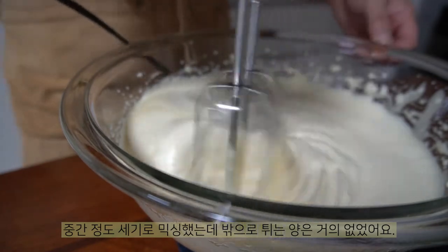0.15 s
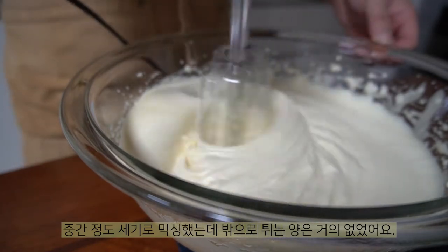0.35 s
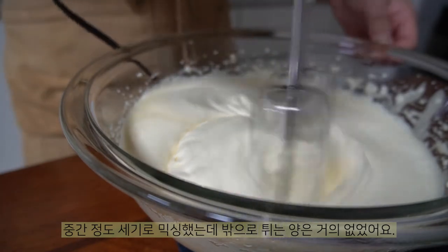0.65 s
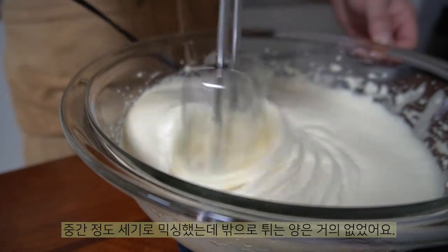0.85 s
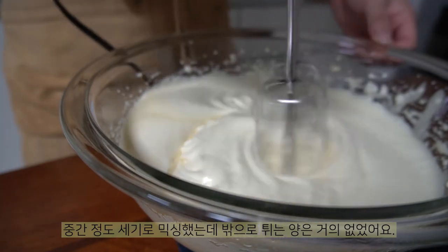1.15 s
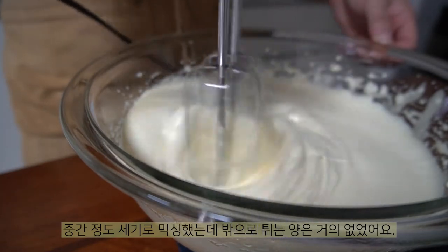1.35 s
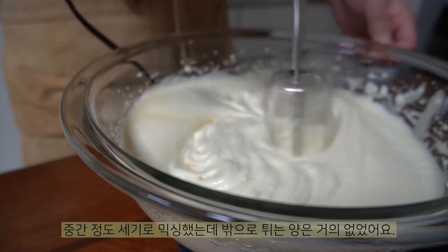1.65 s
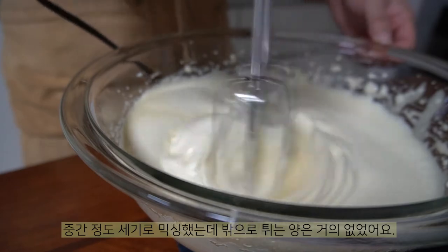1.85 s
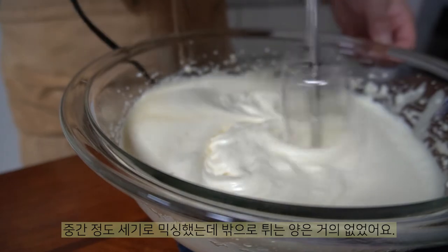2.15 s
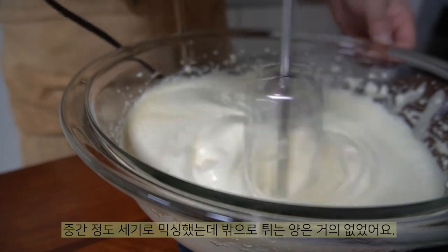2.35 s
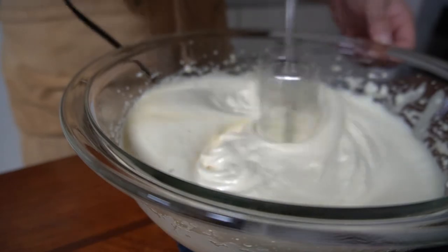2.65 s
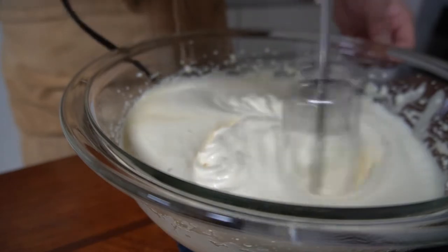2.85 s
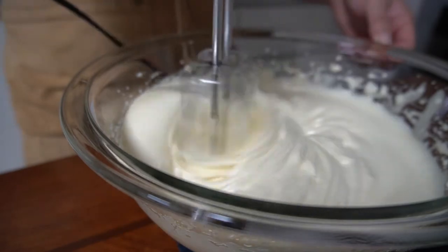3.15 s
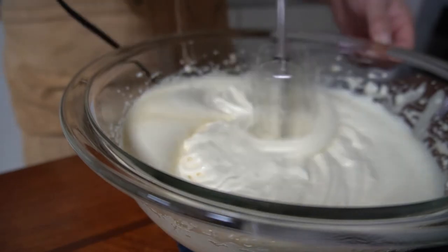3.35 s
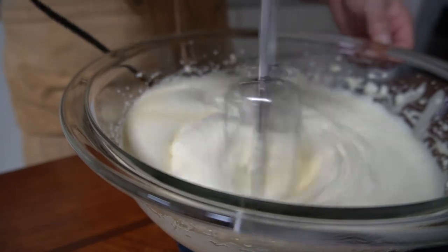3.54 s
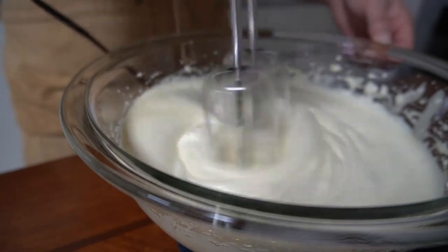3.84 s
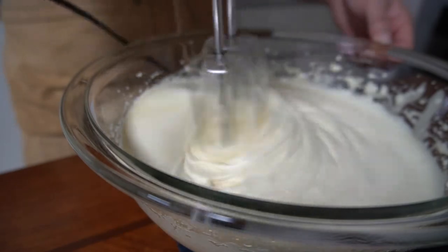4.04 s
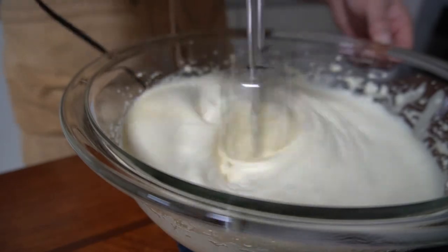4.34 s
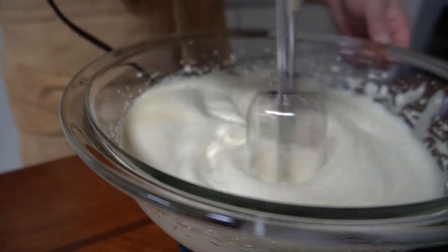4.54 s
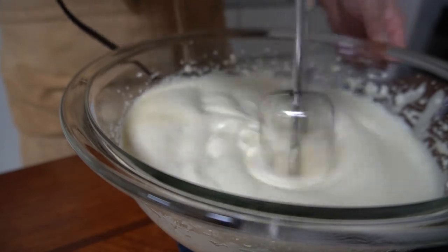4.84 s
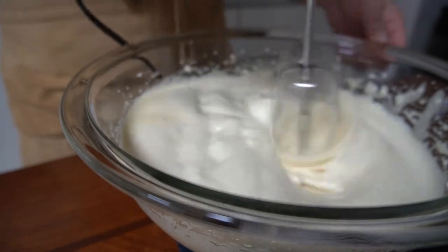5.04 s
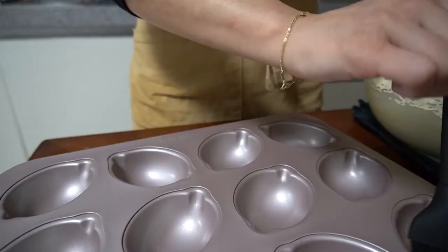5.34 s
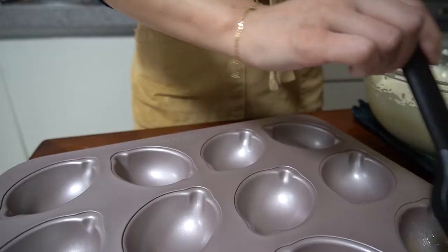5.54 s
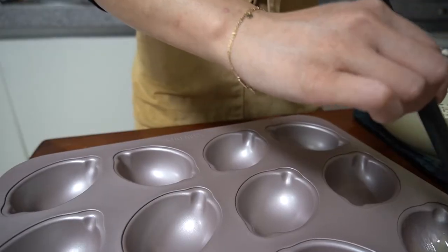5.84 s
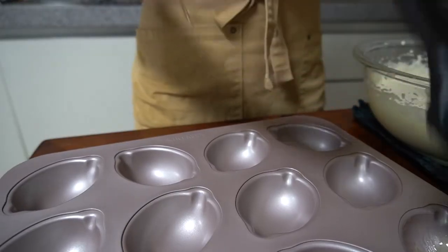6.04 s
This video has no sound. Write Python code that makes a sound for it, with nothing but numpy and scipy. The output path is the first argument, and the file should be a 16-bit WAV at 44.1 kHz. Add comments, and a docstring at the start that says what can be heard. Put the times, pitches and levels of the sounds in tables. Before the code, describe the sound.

Close, bright mixer whine and rushing air swirl over a glass bowl, then stop dead; a ladle scrapes and lightly taps in a hushed kitchen.

```python
"""First an electric hand mixer circles through thick batter in a glass bowl, close to a stereo microphone.
Tones at multiples of the shaft speed make its whine; shaped noise makes brush hiss, fan air, roar and slop.
The sound then cuts to a quiet kitchen with a humming appliance: a sine over soft noise. A ladle scrapes
the bowl (grainy noise through resonances) and taps it once (fading sines); small noise ticks fall."""
import sys
import numpy as np
from scipy import signal
from scipy.fft import rfft, irfft, next_fast_len
from scipy.io import wavfile
from scipy.ndimage import uniform_filter1d, map_coordinates

SR = 44100
rng = np.random.default_rng(int(sys.argv[2]) if len(sys.argv) > 2 else 0)


def digitize_waveform(pressure):
    """Quantize a signal to 16-bit integers and store it at the path in sys.argv[1].

    Rows of a 2-D input are taken as channels; values are limited to [-1, 1].
    """
    field = np.atleast_2d(pressure).T
    bounded = np.clip(field, -1, 1)
    quanta = np.round(bounded * 32767).astype(np.int16)
    wavfile.write(sys.argv[1], SR, quanta)


def boost(x):
    """Linear amplitude factor 10**(x/20) for a level x in decibels (scalar or array-like)."""
    u = np.asarray(x, float) / 20
    return 10 ** u


N = 272959
TIME = np.arange(N) / SR  # s

CUT_S, TOP_HZ = 5.2205, 15740  # the mixer scene ends; nothing sounds above this
# Spectra below give only the shape of a noise; its loudness is set separately.

# Quiet kitchen air: f/Hz, level/dB per Hz
AIR_SPECTRUM = [(15, -16), (30, -2), (60, -16), (100, 0), (150, -2.5), (250, -1), (320, -4), (450, -5.5),
                (650, -14), (900, -20), (1600, -25), (3000, -28.5), (6000, -31.5), (15700, -40.5)]
# Likeness of left and right in the kitchen: f/Hz, correlation
KITCHEN_LIKENESS = [(60, 1.0), (180, 0.99), (550, 0.93), (1650, 0.28), (4970, 0.07), (15000, 0.17)]
# Small ticks: t/s, peak level/dB, centre f/Hz, width/Hz, time to fade by 60 dB/s
TICKS = [(5.3212, -50, 3000, 3000, .01), (5.3531, -44, 7200, 2500, .012), (5.49, -52, 9000, 8000, .04),
         (5.605, -38, 5400, 8500, .006), (5.676, -51, 3770, 4800, 0.082), (5.862, -52, 12000, 8000, .02),
         (5.872, -49, 8000, 5000, .02)]
# The struck bowl's ring: f/Hz, typical level/dB, time to fade by 60 dB/s
GLASS_RING = [(1760, -51, 0.1), (2380, -58, .1), (3100, -58, .1), (3400, -60, .08), (4950, -63, .07),
              (5500, -62, .07), (6050, -61, .06)]
# Resonances of the scraped bowl: f/Hz, width/Hz, level/dB
BOWL_MODES = [(390, 79, 1.5), (570, 94, -0.5), (720, 110, -4.5)]
# Resonances of the ladle, before squaring: f/Hz, width/Hz, level/dB
LADLE_MODES = [(1020, 240, 0.5), (1347, 170, 4.5), (1820, 590, -5)]
# Ladle strokes: t of full pressure/s, rise/s, hold/s, ladle level/dB, bowl level/dB
STROKES = [(5.233, .01, .06, -72.5, -47.5), (5.382, 0.12, 0.1, -51, -39.5), (5.688, .015, .005, -52, -44.5),
           (5.768, .02, .04, -55, -52), (5.856, .07, .095, -52, -41.5)]
KITCHEN_HUM_HZ, TAP_S = 59.4, 5.677
RISE_DB = 14.5  # a stroke gains this much over its rise time
BOWL_SAG_DB_PER_S = 52  # while the pressure holds
LADLE_FALL_DB_PER_S, BOWL_FALL_DB_PER_S = 550, 220  # after letting go
REST_LADLE_DB, REST_BOWL_DB = -68, -58  # the ladle keeps brushing faintly between strokes

# Appliance hum under the mixer: f/Hz, mean level/dB
DRONE = [(59.2, -62.5)]
# Slopping batter: f/Hz, level/dB per Hz
SLOP_SPECTRUM = [(10, -45), (28, -23), (48, -28), (95, -23.5), (113, -14.5), (200, -11), (240, -4),
                 (330, -3.5), (420, -6), (700, -16), (910, -48), (1540, -120)]
# Roar of the housing: f/Hz, level/dB per Hz
ROAR_SPECTRUM = [(80, -120), (180, -31.5), (300, -19.5), (420, -10.5), (560, -11), (700, -10), (900, -12),
                 (1300, -10.5), (1500, -10), (2100, -8.5), (3000, -9.5), (3900, -36), (6600, -120)]
# Hiss of the brushes: f/Hz, level/dB per Hz
HISS_SPECTRUM = [(600, -120), (1500, -45), (2500, -15), (3000, -9.5), (4000, -5), (5100, -9.5),
                 (5900, -9.5), (6800, -11), (7900, -12.5), (10000, -12.5), (12000, -17), (14000, -18.5),
                 (14900, -18), (15700, -24)]
# Ring of the fan air, before squaring and shifting: f/Hz, width/Hz, level/dB
VENT_MODES = [(3276, 333, 3.5), (3795, 110, -1.5)]
# Air resonances of the housing, which lift the hiss: f/Hz, width/Hz, level/dB before the fourth power
HOUSING_MODES = [(5460, 380, 2.3), (6290, 470, 1.5), (7370, 760, 1.3)]
# Likeness of left and right by the mixer: f/Hz, correlation
MIXER_LIKENESS = [(60, .999), (120, .989), (250, .994), (400, .994), (700, .975), (1290, 0.93), (2380, 0.9),
                  (4400, 0.86), (8120, 0.63), (15000, .33)]
# The batter's drag slows the shaft: t/s, mean speed/turns per s
SHAFT_SPEED = [(0.0, 411.34), (0.28, 411.43), (0.56, 410.66), (2.24, 410.2), (2.52, 410.82), (2.8, 410.08),
               (3.36, 409.74), (4.06, 410.39), (4.41, 410.38), (4.62, 409.01), (4.69, 409.76),
               (4.97, 408.87), (5.04, 409.75), (5.18, 409.15)]
# Whine: order/multiple of shaft speed, sideband/multiple of MAINS_HZ, mean level/dB
# (where the hand steers an order, this level only sets its left-right difference)
WHINE_ORDERS = [(1, -1, -55), (1, 0, -42), (1, 1, -43), (1, 2, -56), (2, 0, -43), (3, -1, -51), (3, 0, -46),
                (4, 0, -42), (4, 1, -48), (5, 0, -51), (6, 0, -53), (6, 1, -51), (7, -1, -50), (9, 0, -40),
                (10, 0, -54), (11, 0, -56), (12, 0, -45), (12, 1, -58), (13, 0, -55), (14, 0, -55),
                (16, 0, -53), (17, 0, -59), (18, -1, -61), (18, 0, -54), (20, 0, -55), (21, 0, -59),
                (22, 0, -50), (23, 0, -53), (23, 1, -60), (24, -1, -54), (24, 0, -44), (24, 1, -47.5),
                (25, -1, -64), (25, 0, -55.5), (26, 1, -62), (27, 0, -63), (28, 0, -59), (29, 0, -66),
                (30, 0, -51), (31, -1, -66), (31, 0, -64), (32, 0, -54), (33, 0, -63), (34, 0, -65),
                (35, 0, -62), (36, 0, -52), (36, 1, -60), (37, 0, -64), (38, 0, -64)]
# Weak tones of the worm gear: order/multiple of shaft speed, mean level/dB
GEAR_TONES = [(.188, -61), (3.17, -54), (3.29, -54), (3.44, -54), (5.165, -54)]
# Strong orders that the hand steers: order/multiple of shaft speed
STEERED_ORDERS = (1, 2, 3, 4, 9, 12, 22, 24, 30, 32, 36)
# How each of these follows the hand: level/dB, then dB per unit of turn, of leftward, of lift
STEERED_LEVELS = [(-42, 1, 1.26, 0.65), (-42.5, -0.1, -0.1, 1.0), (-45, -2.5, 1, -0.8),
                  (-41.5, -1.2, -0.1, 1.0), (-40, 3, -2, -0.5), (-45.5, 4.5, -1, 1.5), (-50, -1, -0.5, 0.5),
                  (-43, 3.5, 1.5, 0.5), (-53, -3, -2, -0.1), (-52, -1, 3, 2), (-51, -2, 2.5, -2.7)]
# The circling hand: t/s, turn of the vents, leftward, lift (each in units of its own mean swing)
HAND_PATH = [(0.0, -0.0, -0.8, 0), (0.21, -2, 0.5, 1), (0.42, 1, 0.3, 1), (0.63, 1, -1.6, 1.2),
             (0.77, -1.2, 1.3, -0.3), (0.98, 0.5, 0, 1.6), (1.12, 1.5, -0.9, -1.2), (1.26, -0.8, 0.1, 0.5),
             (1.47, -0.5, 1, -0.5), (1.54, 1, 0.3, 2.7), (1.61, 1, -1.0, -0.5), (1.96, -0.8, -0.5, 0.5),
             (2.1, 0.9, -0.4, 1.2), (2.24, -1, -2.7, -1.1), (2.45, -1.2, 0.5, 0.7), (2.59, 0.7, 0.1, 0),
             (2.94, -1.2, -3, 0.7), (3.08, -0.6, 1, 0.2), (3.22, 0.6, 1.2, 0.1), (3.43, 0.5, -0.6, 1),
             (3.64, -1.0, 0, -0.3), (3.78, 0.5, 0.3, 1.7), (3.92, -0.5, 1, -0.8), (4.13, 0.9, 1.5, -1.7),
             (4.34, 0.7, 1.2, -1), (4.48, 1.5, 0.5, -3), (4.55, 3, 0.2, -1), (4.76, 0.4, -0.4, -1.8),
             (4.97, -0.1, -1.5, -0.9), (5.18, 1.4, -1.5, -0.7)]
MAINS_HZ = 120  # the motor's pull pulses at twice the mains frequency

# How the noises follow the hand: level/dB, then dB per unit of turn, of leftward, of lift
SLOP_DB, ROAR_DB = (-42.5, 0, 0.35, 0), (-32.5, -0.37, -0.3, 0.05)
VENT_DB, HISS_DB = (-31, -0.1, 0.55, -0.3), (-31.5, -0.04, 0.6, 0.4)
# Left level minus right level, same columns
VENT_PAN_DB, HISS_PAN_DB = (-3.5, 0.45, 1, 0), (-1.9, 0.3, 0.8, 0.4)
ROAR_PAN_DB = (-0.53, -0.14, 0.61, 0.15)
# The fan's ring moves with the hand: shift/Hz, then Hz per unit of turn, of leftward, of lift
VENT_SHIFT_HZ = (0, 0, 10, 0)
VENT_WANDER_HZ = 15  # rough size of its random drift
# Shifting wall echoes beat against each steered order
ECHO_SHARE, ECHO_SHARE_PER_KHZ, ECHO_RATE = 0.03, 0.036, 10  # rate in random points per s
HEADROOM_DB = 5  # turning toward the microphone lifts an order at most this much; away fades it deeper


def unit(x):
    """Scale to rms 1."""
    return x / np.sqrt(np.mean(np.abs(x) ** 2) + 1e-20)


def along(points, hz):
    """Read a table of frequencies and values on a log frequency axis."""
    f, v = np.transpose(points)
    return np.interp(np.log(hz + 1), np.log(f + 1), v)


def curves(rows):
    """Join the points of each column after the time: one value per sample."""
    s, *columns = np.transpose(rows)
    return [np.interp(TIME, s, column) for column in columns]


def wobble(rate):
    """A smooth random curve through this many random points a second."""
    return map_coordinates(rng.standard_normal(800), [np.arange(N) * rate / SR])


def resonance(modes, f):
    """Add up the responses of damped resonators, with alternating sign."""
    total = 0
    for k, (centre, width, db) in enumerate(modes):
        peak = 1j * f * width / (centre * centre - f * f + 1j * f * width)
        total = total + (-1) ** k * boost(db) * peak
    return total


def filtered(x, response):
    """Multiply the spectrum of x by a response of frequency."""
    m = next_fast_len(N + 8192)
    return irfft(rfft(x, m) * response(np.fft.rfftfreq(m, 1 / SR)), m)[..., :N]


def rush(gain, alike, patchy_db, gate=1):
    """Stereo noise of rms 1 with patches of random gain, multiplied by a gate."""
    z = signal.stft(rng.standard_normal((2, N)), nperseg=512)[2]
    field = uniform_filter1d(rng.standard_normal(z.shape[1:]), 6, 0)  # smooth over frequency
    field = uniform_filter1d(field, 14, 1)  # then over time
    patchy = signal.istft(z * boost(patchy_db * unit(field)), nperseg=512)[1][:, :N]

    def middle_and_side(hz):
        # this angle gives left and right the wanted correlation
        angle = np.arccos(np.clip(along(alike, hz), -1, 1)) / 2
        return gain(hz) * [np.cos(angle), np.sin(angle)]

    mid, side = filtered(gate * patchy, middle_and_side)
    return unit(np.array([mid + side, mid - side]))


def kitchen_hum():
    """The appliance hums as one sine whose level wavers."""
    return np.sqrt(2) * boost(-43.5 + 0.89 * wobble(6)) * np.sin(2 * np.pi * KITCHEN_HUM_HZ * TIME)


def room_air():
    """Quiet room air is soft, mostly low noise."""
    return boost(-45) * rush(lambda hz: boost(along(AIR_SPECTRUM, hz)), KITCHEN_LIKENESS, patchy_db=1.2)


def ticks():
    """Short bursts of noise with a soft start, each in its own band."""
    total, t = np.zeros(N), np.arange(SR // 10) / SR
    for s, db, hz, width, t60 in TICKS:
        edges = np.clip([hz - width / 2, hz + width / 2], 100, SR / 2.5)
        band = signal.butter(2, edges, "band", fs=SR)
        burst = signal.lfilter(*band, rng.standard_normal(len(t)))
        burst *= boost(-60 * t / t60) * (1 - np.exp(-t / t60 / 0.079))
        total[round(s * SR):][:len(t)] += boost(db) * burst / np.abs(burst).max()
    return total


def tap():
    """The tapped glass rings in fading sines under a soft contact."""
    total, t = np.zeros(N), np.arange(SR // 5) / SR
    ring = 0
    for hz, db, t60 in GLASS_RING:
        ring = ring + boost(db + rng.normal(0, 1.5) - 60 * t / t60) * np.sin(2 * np.pi * hz * t)
    total[round(TAP_S * SR):][:len(t)] = ring * (1 - np.exp(-t / 0.004))
    return total


def strokes():
    """Gains of the ladle's and the bowl's ring: each stroke presses on, holds and lets go."""
    ladle, bowl = boost(REST_LADLE_DB), boost(REST_BOWL_DB)
    for s, rise, hold, ladle_db, bowl_db in STROKES:
        before_db = RISE_DB * np.clip((s - TIME) / rise, 0, None)
        held = np.clip(TIME - s, 0, hold)
        after = np.clip(TIME - s - hold, 0, None)
        ladle_now = ladle_db - before_db - LADLE_FALL_DB_PER_S * after
        bowl_now = bowl_db - before_db - BOWL_SAG_DB_PER_S * held - BOWL_FALL_DB_PER_S * after
        ladle = np.maximum(ladle, boost(ladle_now))
        bowl = np.maximum(bowl, boost(bowl_now))
    return ladle, bowl


def scrape():
    """The ladle drags in rough grains over the bowl, and both ring."""
    ladle_gain, bowl_gain = strokes()
    grains = boost(1.3 * wobble(90))
    ladle = rush(lambda hz: resonance(LADLE_MODES, hz) ** 2, KITCHEN_LIKENESS, patchy_db=1.2, gate=grains)
    bowl = rush(lambda hz: resonance(BOWL_MODES, hz), KITCHEN_LIKENESS, patchy_db=1.2, gate=grains)
    return ladle_gain * ladle + bowl_gain * bowl


def kitchen():
    """The quiet kitchen adds up hum, air, scraping, ticks and the tap."""
    return kitchen_hum() + room_air() + scrape() + ticks() + tap()


def follows(hand, setting):
    """A value that moves in proportion to the hand's turn, leftward and lift."""
    base, *per_unit = setting
    return base + np.dot(per_unit, hand)


def sides(hand, pan):
    """Share a level difference out: half up on the left, half down on the right."""
    return np.array([[0.5], [-0.5]]) * follows(hand, pan)


def shifted(x, hz):
    """Move every frequency in x by hz (one value per sample)."""
    analytic = signal.hilbert(x, next_fast_len(N))[..., :N]
    return np.real(analytic * np.exp(2j * np.pi * np.cumsum(hz) / SR))


def drone():
    """An appliance hums under the mixer as a sine with a wavering level."""
    return sum(np.sqrt(2) * boost(db + 0.8 * wobble(2.8)) * np.sin(2 * np.pi * hz * TIME) for hz, db in DRONE)


def batter_slop(hand):
    """Thick batter slops as low noise that swells unevenly."""
    slosh = boost(0.68 * wobble(14) + 0.69 * wobble(5))
    slop = rush(lambda hz: boost(along(SLOP_SPECTRUM, hz)), MIXER_LIKENESS, patchy_db=0.65, gate=slosh)
    return boost(follows(hand, SLOP_DB)) * slop


def housing_roar(hand):
    """The housing roars as broad middle-range noise."""
    roar = rush(lambda hz: boost(along(ROAR_SPECTRUM, hz)), MIXER_LIKENESS, patchy_db=0.66)
    return boost(follows(hand, ROAR_DB) + sides(hand, ROAR_PAN_DB)) * roar


def fan_air(hand):
    """Fan air rings in narrow resonances that move as the vents move."""
    air = rush(lambda hz: resonance(VENT_MODES, hz) ** 2, MIXER_LIKENESS, patchy_db=0.6)
    air = shifted(air, follows(hand, VENT_SHIFT_HZ) + VENT_WANDER_HZ * wobble(5))
    return boost(follows(hand, VENT_DB) + sides(hand, VENT_PAN_DB) + 0.31 * wobble(8)) * air


def brush_hiss(hand, turns, mains):
    """Brushes hiss as noise pulsing with the mains pull and once and twice a shaft turn."""
    spark_db = 0.39 * np.cos(2 * np.pi * mains)
    spark_db += 0.43 * np.cos(2 * np.pi * turns) + 0.65 * np.cos(4 * np.pi * turns)

    def colour(hz):
        lift = sum(np.abs(resonance([mode], hz)) ** 4 for mode in HOUSING_MODES)
        return boost(along(HISS_SPECTRUM, hz)) * np.sqrt(1 + lift)

    hiss = rush(colour, MIXER_LIKENESS, patchy_db=1.0, gate=boost(spark_db))
    return boost(follows(hand, HISS_DB) + sides(hand, HISS_PAN_DB)) * hiss


def echoed(share):
    """Gain of a tone that meets a slowly shifting echo."""
    share = np.clip(share, 0, 1)
    echo = (wobble(ECHO_RATE) + 1j * wobble(ECHO_RATE)) / np.sqrt(2)
    return np.abs(np.sqrt(1 - share ** 2) + share * echo)


def capped(db):
    """Rises level off toward HEADROOM_DB; falls pass."""
    return np.where(db > 0, HEADROOM_DB * np.tanh(db / HEADROOM_DB), db)


def steered_gains(hand):
    """Gains of the strong orders, which swell with the hand and beat with wall echoes."""
    gains = []
    for order, (db, *per_unit) in zip(STEERED_ORDERS, STEERED_LEVELS):
        khz = order * SHAFT_SPEED[0][1] / 1000
        swell_db = db + capped(follows(hand, (0, *per_unit)))
        gains.append(np.sqrt(2) * boost(swell_db) * echoed(ECHO_SHARE + ECHO_SHARE_PER_KHZ * khz))
    return gains


def whine(hand, turns, mains):
    """Shaft orders and mains sidebands; walls and the moving hand make each fade, faster the higher it is."""
    gains = steered_gains(hand)
    coarse = np.arange(0, N + 256, 256)  # slow curves need few points
    middle, apart = np.zeros((2, N))
    for order, side, db in WHINE_ORDERS + [(order, 0, db) for order, db in GEAR_TONES]:
        hz = order * SHAFT_SPEED[0][1]
        knots = coarse / SR * (2.478 + hz / 2200)
        a, b, c, d = (map_coordinates(k, [knots]) for k in rng.standard_normal((4, 100)))
        cycles = (order * turns + side * mains + rng.random()) % 1
        phase = (2 * np.pi * cycles).astype(np.float32)
        cos, sin = np.cos(phase), np.sin(phase)

        def played(real, imag):
            return np.interp(np.arange(N), coarse, real) * cos + np.interp(np.arange(N), coarse, imag) * sin

        reflected = np.clip(0.2 + hz / 9000, 0, 1)  # share of the power that fades at random
        if side == 0 and order in STEERED_ORDERS:
            middle += gains[STEERED_ORDERS.index(order)] * cos
        else:
            direct = np.sqrt(2 - 2 * reflected)
            echo = np.sqrt(reflected)
            middle += played(boost(db) * (direct + echo * a), boost(db) * echo * b)
        # the microphone's two ports hear different walls
        alike = np.clip(along(MIXER_LIKENESS, hz), 0, 1)
        spread = boost(db + 2.0) * np.sqrt((1 - alike) / (1 + alike))
        apart += played(spread * c, spread * d)
    return np.array([middle + apart, middle - apart])


def mixer():
    """One shaft, one mains pulse and one circling hand drive all the mixer's sounds."""
    turns = np.cumsum(curves(SHAFT_SPEED)[0] + 0.12 * wobble(7)) / SR
    mains = MAINS_HZ * TIME
    hand = uniform_filter1d(curves(HAND_PATH), SR // 20)
    dull = drone() + batter_slop(hand) + housing_roar(hand)
    bright = fan_air(hand) + brush_hiss(hand, turns, mains)
    return dull + bright + whine(hand, turns, mains)


def scene():
    """The mixer plays until a hard cut to the kitchen, blended over 1 ms."""
    after = np.clip((TIME - CUT_S) / 0.001, 0, 1)
    return (1 - after) * mixer() + after * kitchen()


def roll_off(x):
    """The treble ends steeply here."""
    return signal.sosfilt(signal.butter(12, 16750, fs=SR, output="sos"), x)


def record(dry):
    """The band limit removes everything from TOP_HZ up."""
    limited = filtered(dry, lambda hz: hz < TOP_HZ)
    return roll_off(limited)


dry = scene()
out = record(dry)
digitize_waveform(out)
```